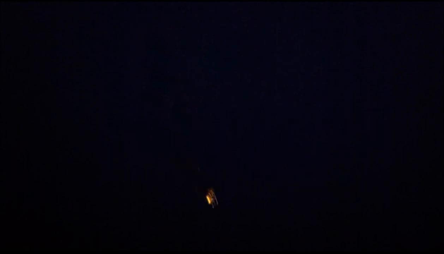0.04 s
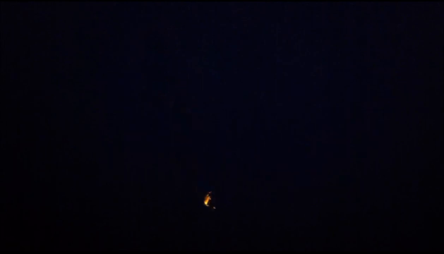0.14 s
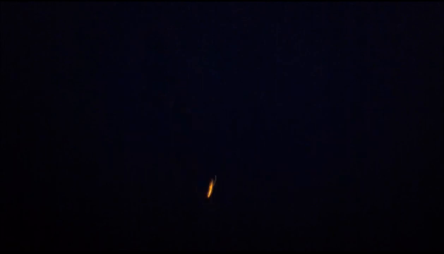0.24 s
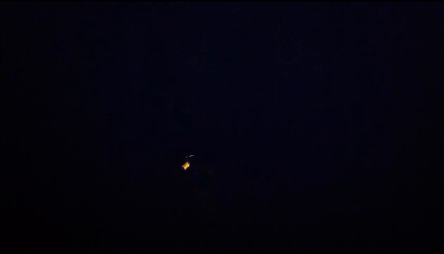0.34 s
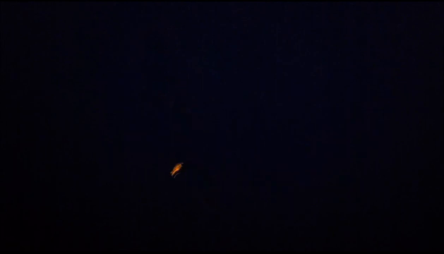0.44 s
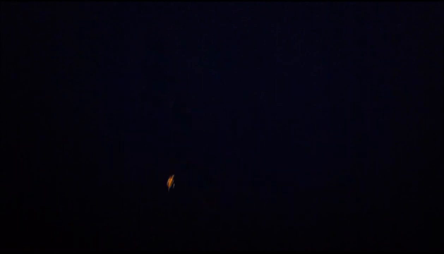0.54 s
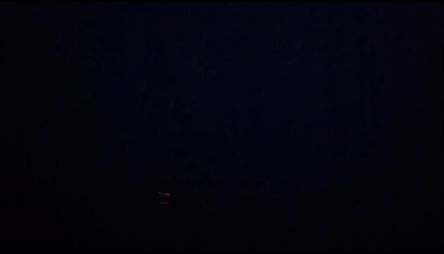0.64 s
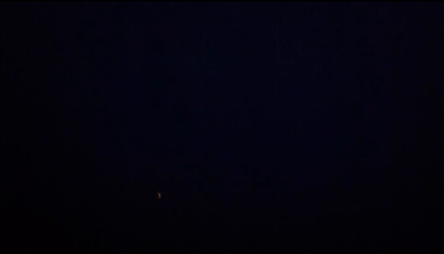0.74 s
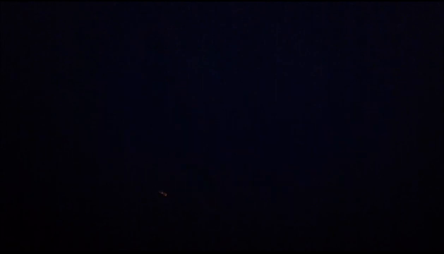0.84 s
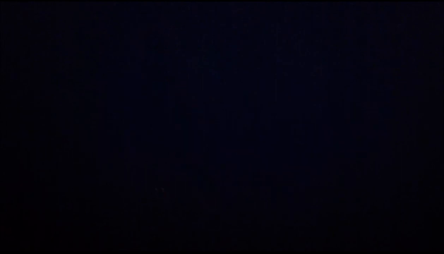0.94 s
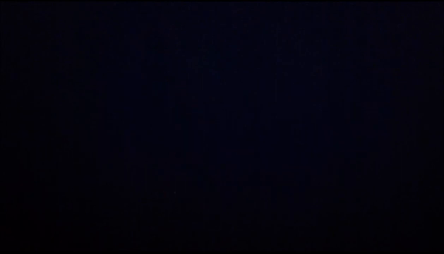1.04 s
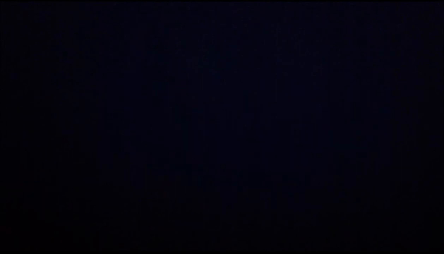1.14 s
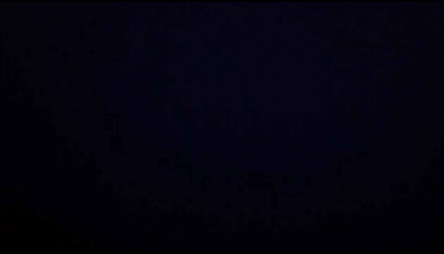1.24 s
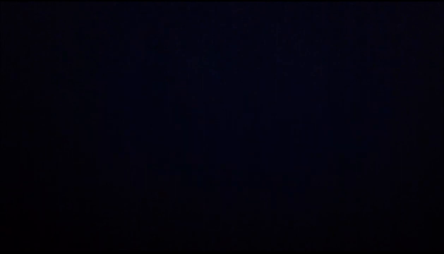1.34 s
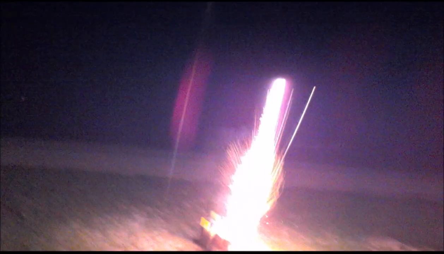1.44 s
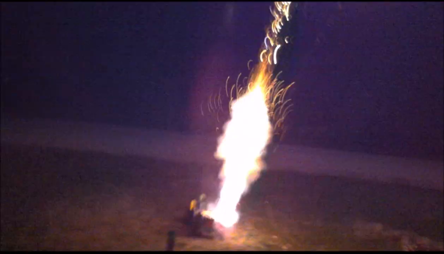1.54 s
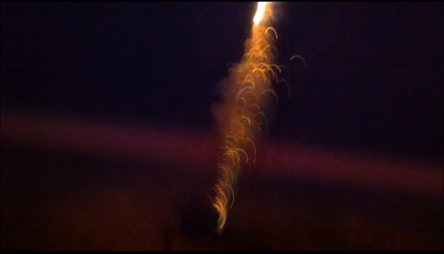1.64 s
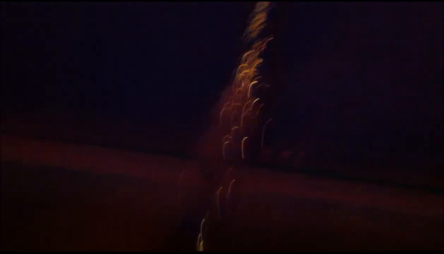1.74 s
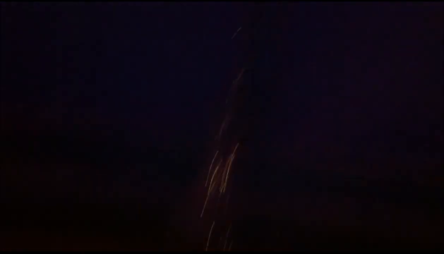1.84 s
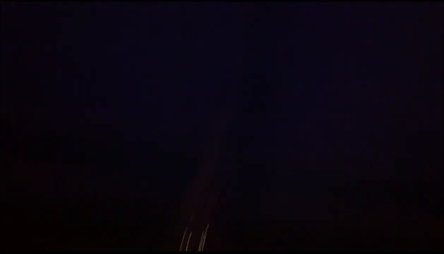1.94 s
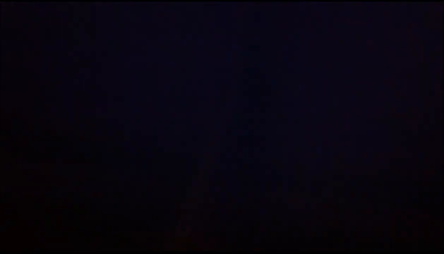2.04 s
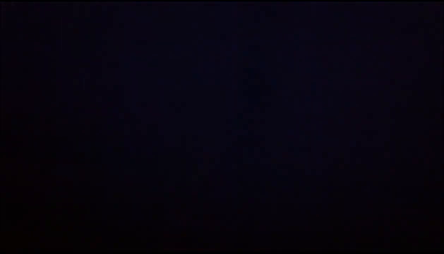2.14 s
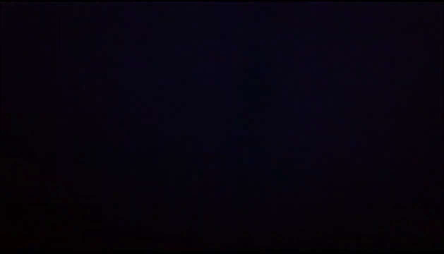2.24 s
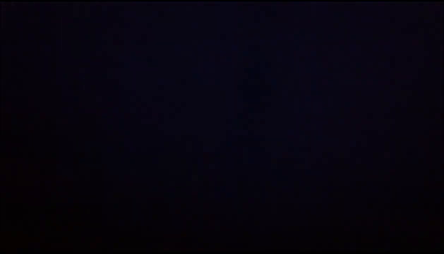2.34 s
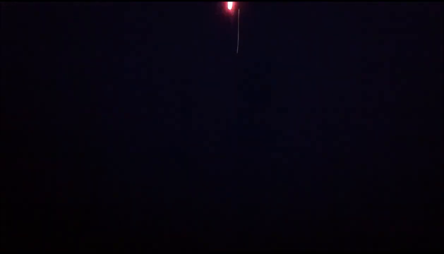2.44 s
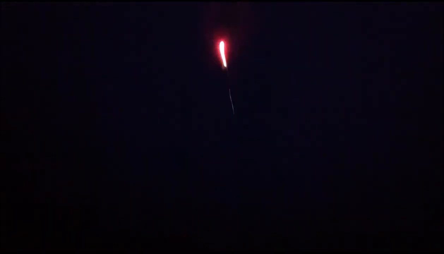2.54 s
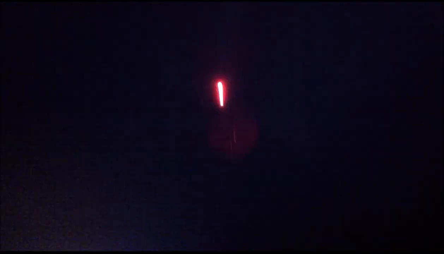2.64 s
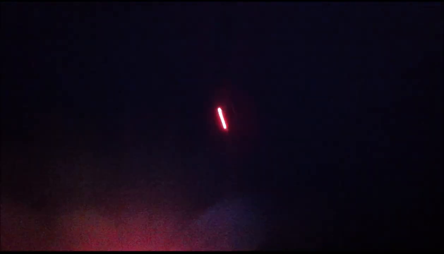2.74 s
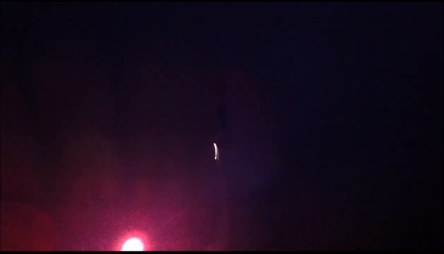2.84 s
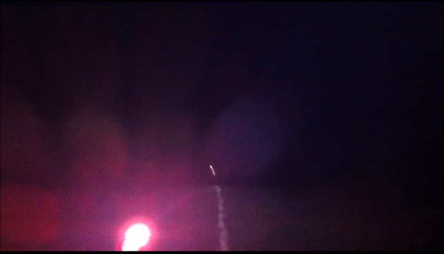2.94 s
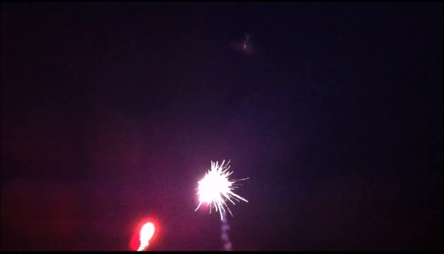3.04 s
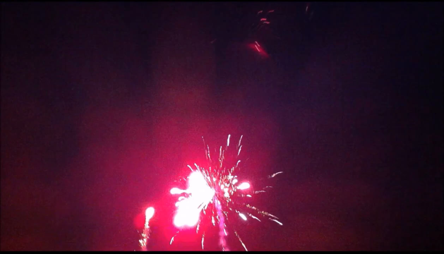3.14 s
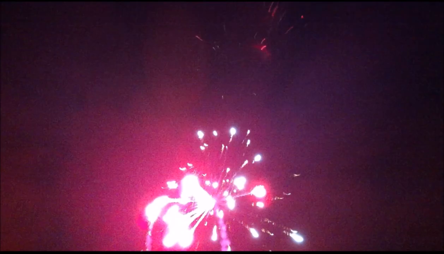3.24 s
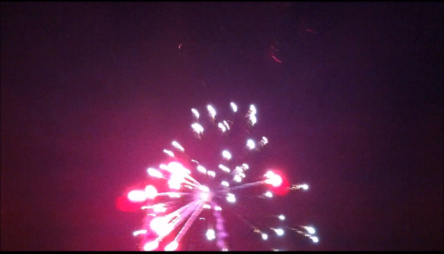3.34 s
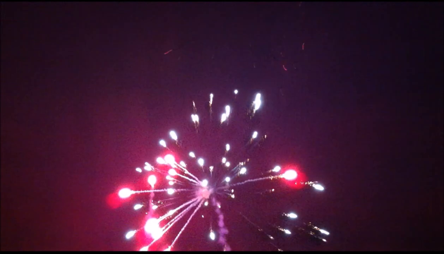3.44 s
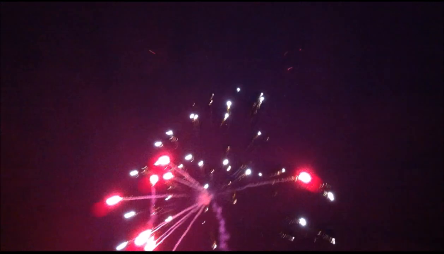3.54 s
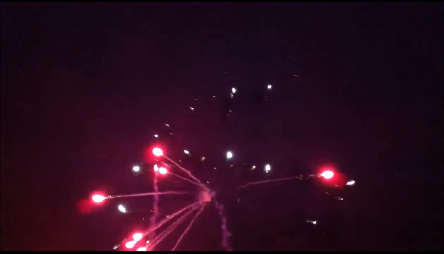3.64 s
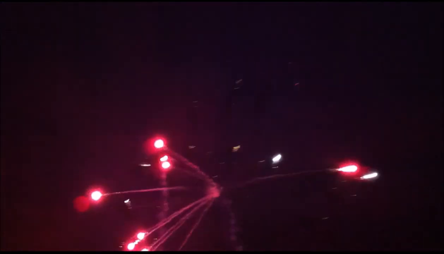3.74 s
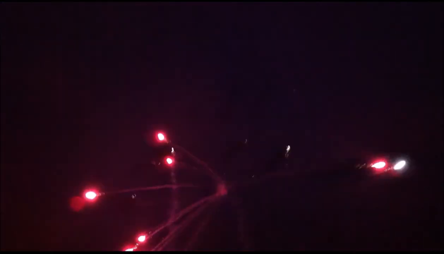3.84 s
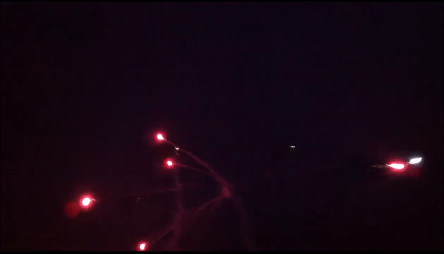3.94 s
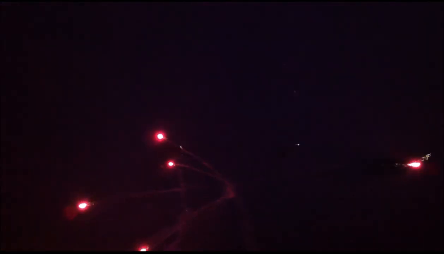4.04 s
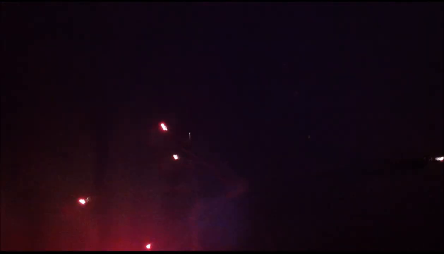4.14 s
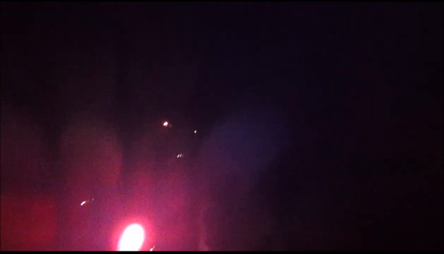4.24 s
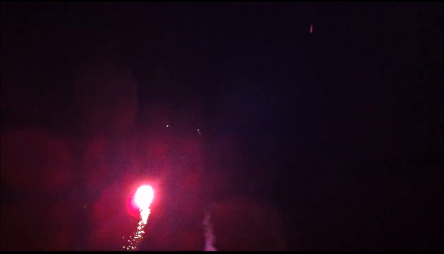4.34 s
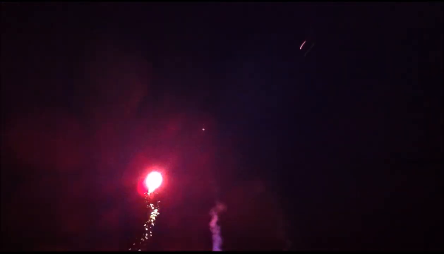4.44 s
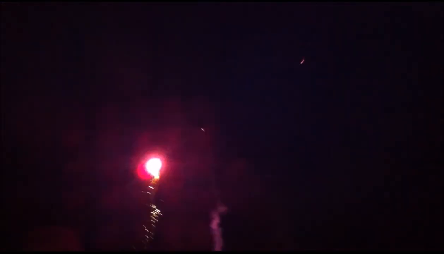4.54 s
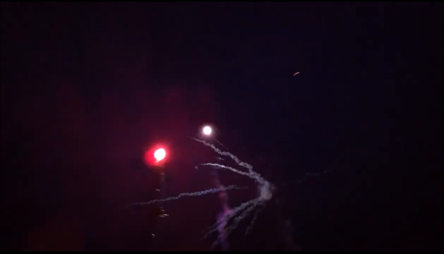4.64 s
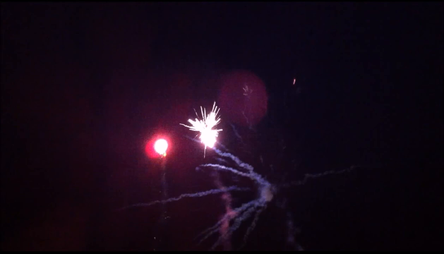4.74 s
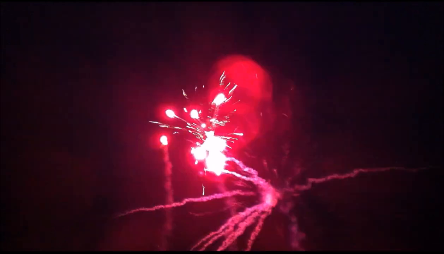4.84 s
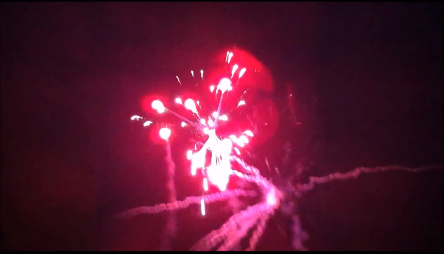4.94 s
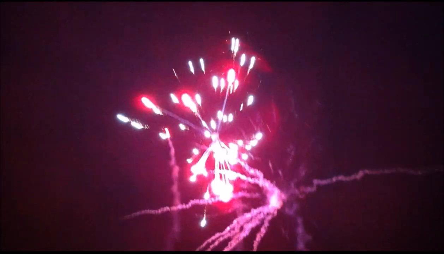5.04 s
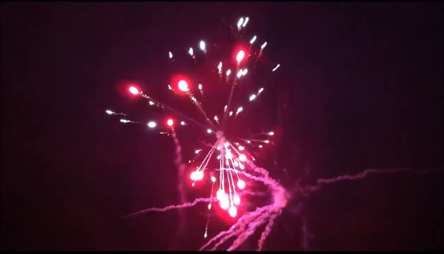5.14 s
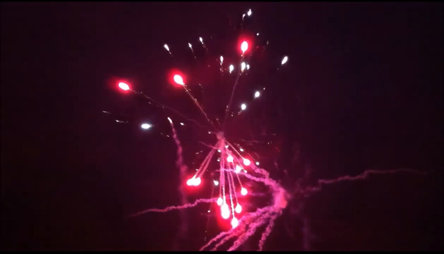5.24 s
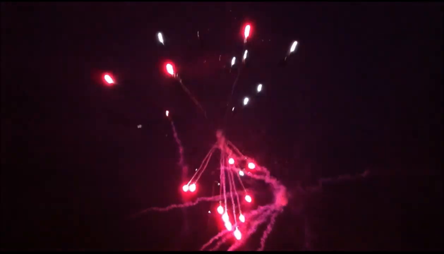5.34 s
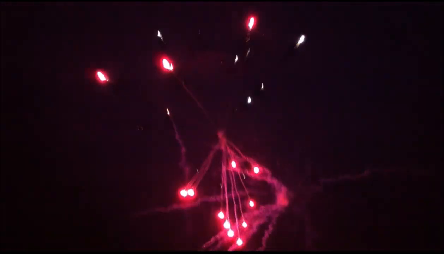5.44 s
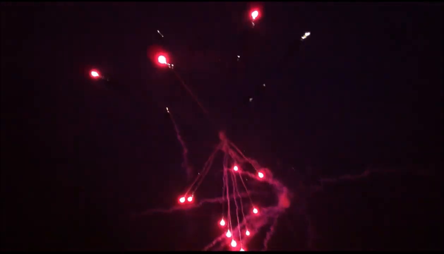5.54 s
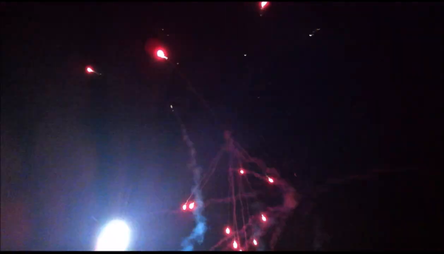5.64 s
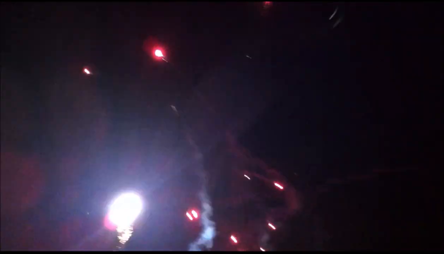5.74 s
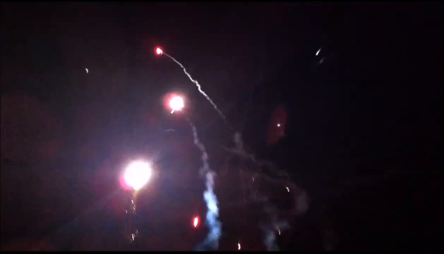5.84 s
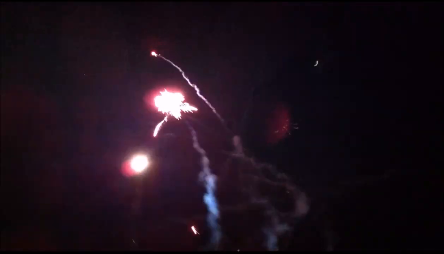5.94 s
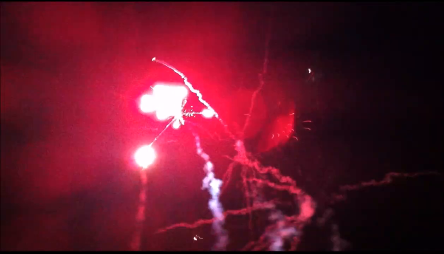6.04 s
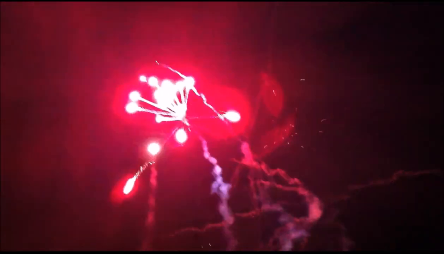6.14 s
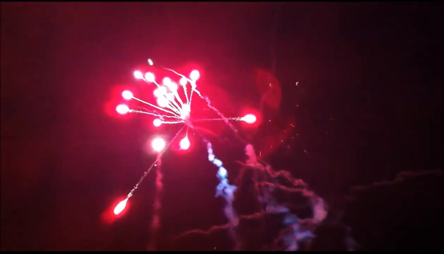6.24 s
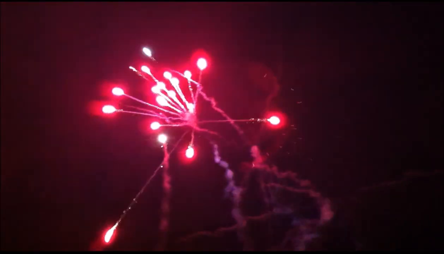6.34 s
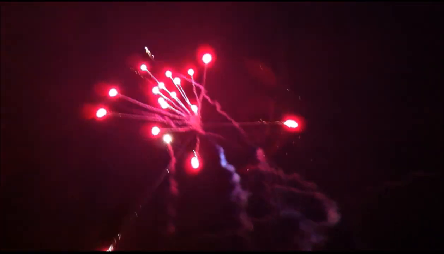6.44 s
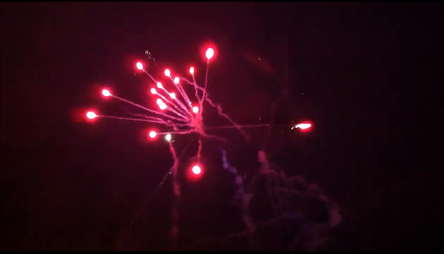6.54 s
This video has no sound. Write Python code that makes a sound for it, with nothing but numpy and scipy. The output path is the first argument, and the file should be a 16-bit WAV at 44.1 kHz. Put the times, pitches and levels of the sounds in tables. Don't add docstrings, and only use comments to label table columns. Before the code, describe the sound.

Quiet night insects and faint handling rustles, then a nearby firework cake fires four harsh, overloaded launch bangs with sharp overhead bursts and rolling echoes.

```python
import sys
import numpy as np
from scipy import signal
from scipy.fft import rfft, irfft
from scipy.io import wavfile
from scipy.ndimage import uniform_filter1d

SR = 44100
rng = np.random.default_rng(int(sys.argv[2]) if len(sys.argv) > 2 else 0)


def wrap_up_sound(samples):
    columns = np.atleast_2d(samples).T
    tamed = np.clip(columns, -1, 1)
    steps = np.round(tamed * 32767).astype(np.int16)
    wavfile.write(sys.argv[1], SR, steps)


def boost_factor(decibels):
    exponent = np.asarray(decibels, float) / 20
    return 10 ** exponent


N = 290619


def evened(x):
    return x / np.sqrt(np.mean(x ** 2) + 1e-20)


def read(points, hz):
    f, value = np.transpose(points)
    return np.interp(np.log(hz + 1), np.log(f + 1), value)


def add(mix, s, sound):
    part = mix[round(s * SR):][:len(sound)]
    part += sound[:len(part)]


def coloured(points, size):
    z = rfft(rng.standard_normal(size))
    hz = np.fft.rfftfreq(size, 1 / SR)
    return evened(irfft(z * boost_factor(read(points, hz)), size))


def resonate(x, hz, width):
    r = np.exp(-np.pi * width / SR)
    return signal.lfilter([1, 0, -r], [1, -2 * r * np.cos(2 * np.pi * hz / SR), r * r], x)


# (f/Hz, width/Hz, level/dB)
INSECTS = [
    (2284, 85, -59.5),
    (2130, 390, -63.5),
    (3330, 50, -70.5),
    (6700, 1600, -67),
]


def insects():
    throb = boost_factor(0.92 * evened(uniform_filter1d(rng.standard_normal(N), 500)))
    song = np.zeros(N)
    for hz, width, db in INSECTS:
        voice = resonate(rng.standard_normal(N), hz, width)
        song += boost_factor(db) * evened(resonate(voice, hz, width))
    return song * throb


# (t/s, depth level/dB)
DUCKS = [
    (1.579, 17.5),
    (2.66, 28),
    (3.253, 23),
    (4.02, 17.5),
    (4.995, 42),
    (5.494, 21),
    (6.159, 28.5),
]


def duck_depth(t):
    recovery_db_per_s = 12
    drops = [np.where(t > s, db - recovery_db_per_s * (t - s), 0) for s, db in DUCKS]
    return np.max(drops, 0).clip(0)


# (t/s, level/dB)
NIGHT_SWELL = [(0, 10.5), (.2, 11.5), (.5, 8.5), (.9, 7), (1.2, 5.5), (1.55, 8), (2.6, 6.5), (3.2, 12),
               (4.3, 3.5), (4.95, 4.5), (5.4, 9), (6.1, 9)]
# (f/Hz, level/dB per Hz)
AIR = [(15, -54.5), (25, -13), (65, -7.5), (156, 6.5), (358, -4.5), (423, -4), (1350, -2.5), (2280, -2.5),
       (3600, -9.5), (4680, -53), (7920, -120)]
# (f/Hz, level/dB per Hz)
HISS = [(1650, -48), (2800, -15.5), (3380, -13), (4180, -14), (4590, -12.5), (5380, -8), (7360, -8.5),
        (10700, -17), (12600, -12), (14800, -8), (15900, -5.5)]


def night():
    t = np.arange(N) / SR
    swell = boost_factor(np.interp(t, *np.transpose(NIGHT_SWELL)))
    hum = boost_factor(-63) * coloured(AIR, size=N)
    hiss = boost_factor(-61.5) * coloured(HISS, size=N)
    duck_db = duck_depth(t)
    background = hum / boost_factor(0.51 * duck_db) + hiss / boost_factor(0.83 * duck_db)
    return swell * background + insects() / boost_factor(duck_db)


# (f/Hz, level/dB per Hz)
WIND = [(15, -6), (40, -6), (90, -4), (130, 0), (220, -30), (20000, -90)]


def wind():
    gusts_db = -84 + 3.0 * evened(uniform_filter1d(rng.standard_normal(N), 6000))
    return boost_factor(gusts_db) * coloured(WIND, size=N)


# (t/s, level/dB, colour f/Hz,
# length/s)
RUSTLES = [(.17, -51.5, 790, 0.13), (.18, -55.5, 300, .1), (.295, -48.5, 600, .012),
           (.315, -46.5, 660, 0.0091), (.42, -54.5, 900, 0.057), (.55, -52, 107, 0.055),
           (.765, -51, 490, 0.066), (.78, -47, 210, 0.045), (.818, -46.5, 596, 0.011),
           (.955, -49.5, 616, 0.0091), (1.36, -58, 676, 0.052), (1.8, -55, 60, 0.18), (2.3, -59, 70, .13),
           (2.42, -51, 70, 0.11), (2.465, -46.5, 137, 0.033), (2.58, -50.5, 547, 0.034),
           (.04, -54.5, 5400, 0.15), (2.5, -57.5, 149, 0.048)]


def rustle(db, hz, length):
    scrape = resonate(rng.standard_normal(6000), hz, 0.9 * hz)
    scrape = resonate(scrape, hz, 0.9 * hz)[:round(length * SR)]
    return boost_factor(db) * evened(scrape) * signal.windows.tukey(len(scrape), 0.6)


# (t of the bang/s, level/dB, length/s)
LEADS = [
    (1.577, -31, 0.0088),
    (2.659, -15, 0.0056),
    (3.26, -45.5, 0.0065),
    (4.0225, -23, 0.0045),
    (5.004, -25, 0.0046),
    (5.492, -14, 0.0031),
    (6.142, -35, 0.0023),
]


def lead(s, db, length):
    rise = np.linspace(0, 1, round(length * SR)) ** 2
    return s - length, boost_factor(db) * rise * coloured(JET_COLOUR, size=4000)[:len(rise)]


# (t/s, level/dB, f/Hz,
# t60/s)
RINGS = [(1.5792, -1.5, 758, .042), (1.582, -1, 1995, .013), (1.5843, -7, 2260, .013),
         (1.5873, -5.5, 1770, .032), (1.5917, -16, 1460, .0044), (1.600, -11, 2210, .0091),
         (1.609, -15.5, 2490, .019), (2.6655, -10.5, 1830, .0063), (4.0233, -5, 1520, .0085),
         (4.0308, -14.5, 1754, .012), (4.0345, -22, 1850, .0099), (4.0735, -10, 2760, .012),
         (5.497, -1.5, 2500, .0052), (5.4983, -15.5, 2050, .004), (5.5017, -5.5, 2250, .0046),
         (5.5462, -16.5, 8700, .011)]


def ring(db, hz, t60):
    t = np.arange(2000) / SR
    wander = evened(uniform_filter1d(rng.standard_normal(2000), round(SR / hz)))
    turns = np.cumsum(hz * (1 + 0.15 * wander - 0.081 * t / t60)) / SR
    swing = np.sin(2 * np.pi * turns) + 0.31 * np.sin(2 * np.pi * 1.55 * turns)
    return -boost_factor(db - 40 * t / t60 - 39 * (t / t60) ** 2) * swing


# (t/s, level/dB, colour f/Hz, t60/s, share of wide noise 0-1)
JETS = [(1.5815, -17.5, 1460, .058, 0.52), (1.5858, 1, 4480, 0.025, 0.77), (1.590, -10, 1520, 0.092, 0.62),
        (1.596, -15.5, 11500, .0099, 0.36), (2.6585, -5.5, 1200, 0.014, 0.63),
        (2.661, -1, 5560, .022, 0.72), (2.6645, -10, 2130, 0.11, 0.48), (3.258, -11, 2750, 0.053, 0.94),
        (3.296, -15.5, 1800, 0.017, 0.35), (3.3, -28, 4800, 0.0089, .2), (4.0155, -19, 1200, 0.062, 1),
        (4.0205, -4.5, 7100, 0.0057, 0.15), (4.0225, -6.5, 3200, 0.094, 0.68),
        (5.4927, -21, 4000, .011, 0.11), (5.494, -16, 8700, 0.02, 0.22), (5.4965, -11, 2850, 0.11, 0.7)]
# (f/Hz, level/dB per Hz)
JET_COLOUR = [(35, -26), (60, -28.5), (358, 8.5), (1330, -6.5), (2970, -6.5), (7780, -33), (10100, -31),
              (15000, -17.5), (16500, -44.5)]


def jet(db, hz, t60, wide_share):
    t = np.arange(5000) / SR
    wide = coloured(JET_COLOUR, size=5000)
    tone = evened(resonate(rng.standard_normal(5000), hz, 0.71 * hz))
    share = np.clip(wide_share, 0, 1)
    rise = np.minimum(t / (0.033 * t60), 1)
    return boost_factor(db - 60 * t / t60) * rise * (share * wide + (1 - share) * tone)


# (t/s, level/dB, f/Hz, t60/s)
THUMPS = [
    (1.5905, -1, 204, 0.015),
    (1.6015, -10.5, 328, 0.03),
    (1.6480, -20, 302, 0.034),
    (2.6662, -8.5, 297, 0.011),
    (3.2746, -19, 298, 0.066),
    (3.3001, -18, 314, 0.054),
    (4.0242, 7.7, 306, 0.0092),
    (5.0420, -32, 310, .04),
    (5.4968, -9, 228, 0.041),
    (6.2051, -25, 310, 0.046),
]


def thump(db, hz, t60):
    t = np.arange(3000) / SR
    return -boost_factor(db - 60 * t / t60) * np.sin(2 * np.pi * hz * t)


# (t/s, tail level/dB, tail tilt/dB per octave, near wall level/dB, far wall level/dB)
LAUNCHES = [
    (1.5874, -1.5, 0.2, -8, -26.5),
    (2.6631, -1, 0.6, 2, -2),
    (4.0206, -0.74, 0.34, 0, 2.8),
    (5.4940, 1.06, 0.53, -1, 1.3),
]
# (level/dB, f/Hz, t60/s)
NEAR_WALL = [
    (-16.5, 310, 0.025),
    (-22.5, 240, 0.032),
    (-12, 3900, 0.011),
    (-15.5, 6700, 0.017),
]
# (level/dB, f/Hz, t60/s)
FAR_WALL = [
    (-17, 290, 0.035),
    (-18.5, 2900, 0.036),
    (-28.5, 3600, 0.25),
    (-19.5, 4000, 0.0064),
    (-17, 3500, 0.013),
    (-14, 3630, .0055),
]
NEAR_WALL_S = (.0223, .040, .0217, .021)
FAR_WALL_S = (.056, .052, .061, .0494, .0533, .0575)


def walls(s, near_db, far_db):
    def hiss(db, hz, t60):
        return jet(db, hz, t60, wide_share=0.3)

    near = zip((thump, thump, ring, hiss), NEAR_WALL_S, NEAR_WALL)
    far = zip((thump, hiss, hiss, ring, ring, ring), FAR_WALL_S, FAR_WALL)
    slaps = []
    for wall_db, wall in ((near_db, near), (far_db, far)):
        for source, delay, (db, *row) in wall:
            slaps.append((s + delay, source(wall_db + db, *row)))
    return slaps


# (delay t/s, build-up/s, level/dB, tilt/dB per octave, t60/s)
LAUNCH_ECHOES = [
    (.025, 0.012, -37, -8.5, 0.95),
    (0.031, .02, -34.5, 3, 0.57),
    (0.093, 0.03, -27.5, 3, 0.51),
    (.15, .1, -37.5, 1.2, 2.44),
    (.4, 0.22, -55, -2.5, 5.4),
]
BURST_ECHOES = [
    (.014, 0.0095, -23, -5, 0.18),
    (.015, 0.035, -26.5, 0, 1.46),
    (0.081, 0.26, -29, -0.8, 3.32),
    (.5, 0.64, -43, -2, 8.9),
]


def echo_power(hz, t):
    octaves = np.log2((hz + 150) / 1100)
    loss_db_per_s = 28 * (hz / 10000) ** 0.87
    power = 1e-14
    for bangs, groups in ((LAUNCHES, LAUNCH_ECHOES), (BURSTS, BURST_ECHOES)):
        for s, db, tilt_db, *_ in bangs:
            air_db = loss_db_per_s * np.maximum(t - s, 0)
            for delay, build, group_db, group_tilt_db, t60 in groups:
                age = np.maximum(t - s - delay, 0)
                level_db = db + group_db + (tilt_db + group_tilt_db) * octaves - 60 * age / t60 - air_db
                power = power + (np.minimum(age / build, 1) * boost_factor(level_db)) ** 2
    return power


# (f/Hz, level/dB per Hz)
TAIL_COLOUR = [(29, -46), (50, -36), (119, -6.5), (240, -1.5), (559, 1.5), (997, -3), (2010, -2),
               (2680, -5.5), (3100, -5), (6240, -14.5), (10100, -23), (13200, -24), (16000, -29.5)]


def tails():
    hz, frame_s, spectrum = signal.stft(coloured(TAIL_COLOUR, size=N), SR, nperseg=512, noverlap=384)
    hz = hz[:, None]
    field_db = 10 * np.log10(echo_power(hz, frame_s))

    def blotches(bands, frames):
        grain = uniform_filter1d(rng.standard_normal(field_db.shape), bands, 0)
        return evened(uniform_filter1d(grain, frames, 1))

    patches = blotches(8, 10)
    ridges = blotches(2, 50)
    housing_db = 1.4 * np.exp(-((hz - 2200) / 300) ** 2)
    level_db = field_db + housing_db + 1.1 * patches + 2.0 * ridges
    return signal.istft(spectrum * boost_factor(level_db), SR, nperseg=512, noverlap=384)[1][:N]


# (t/s, spike level/dB, spike width/ms, suction level/dB, share of a close twin spike)
SHOCKS = [(3.2533, -5, 0.074, 5.5, 0.6), (3.2559, -33, .14, -17, 0), (4.9959, 2.5, 0.13, 1.5, 0.86),
          (6.1596, 2.5, 0.13, 3.7, .99), (6.1645, -34, .13, -17.5, .2), (2.6628, -20, 0.17, 0.5, .21),
          (2.6638, 3.5, 0.67, -23, 0.53), (4.0206, 8.5, 0.14, -5.2, 0.21), (5.4941, -4, 0.073, 0.5, 0.047),
          (5.4945, 12.5, .071, -9, 0), (5.4951, -8, 0.12, -31.5, 0), (5.4955, -1, 0.06, -13, 0)]


def shock(spike_db, width_ms, suction_db, twin, low_hz=180):
    u = np.arange(1500) / SR * 1000 / width_ms

    def spike(v):
        return np.sin(np.pi * np.clip(v, 0, 1)).clip(0) ** 1.85

    fall = np.sin(np.pi / 2 * np.clip(u - 0.87, 0, 1)) ** 2
    swing = signal.sosfilt(signal.butter(2, low_hz, "high", fs=SR, output="sos"), fall)
    push = spike(u / 1.076) + twin * spike(u / 1.095 - 1.05)
    return boost_factor(spike_db) * push - 1.125 * boost_factor(suction_db) * swing


# (t/s, tail level/dB, tail tilt/dB per octave, ground echo level/dB)
BURSTS = [
    (3.2534, 0.6, 0.5, 5),
    (4.9959, -9.5, 0.6, -0.5),
    (6.1595, -5, 0.7, 3.5),
]


def burst(s, tail_db, echo_db):
    def fizz():
        return jet(-13.5 + 0.62 * tail_db, hz=2240, t60=0.038, wide_share=0.71)

    ground_s = s + 0.0114
    echo = shock(echo_db, width_ms=0.36, suction_db=echo_db - 4.5, twin=0.58)
    return [(s, fizz()), (ground_s, echo), (ground_s, fizz())]


# (t/s, level/dB, colour f/Hz, length/s)
LATE_SLAPS = [
    (3.774, -40.5, 820, 0.052),
    (4.798, -47, 546, 0.023),
    (4.897, -48.5, 480, 0.059),
    (6.095, -46, 587, 0.032),
]


def late_slap(db, hz, length):
    return rustle(db, hz, length)


def scene():
    mix = night() + tails()
    for table, source in ((RUSTLES, rustle), (RINGS, ring), (JETS, jet), (THUMPS, thump),
                          (SHOCKS, shock), (LATE_SLAPS, late_slap)):
        for s, *row in table:
            add(mix, s, source(*row))
    parts = [lead(*row) for row in LEADS]
    for s, _, _, near_db, far_db in LAUNCHES:
        parts += walls(s, near_db, far_db)
    for s, tail_db, _, echo_db in BURSTS:
        parts += burst(s, tail_db, echo_db)
    for s, sound in parts:
        add(mix, s, sound)
    return mix[None]


# (t/s, length/s, lowest f/Hz, share of bands dropped 0-1)
STARVED = [(.4, .022, 300, .5), (.7, .022, 300, .6), (1.03, .03, 2500, .85), (1.03, .03, 250, .5),
           (1.13, .022, 500, .6), (1.45, .02, 2500, .5), (1.56, .025, 3000, .8), (1.618, .008, 4500, .7),
           (1.68, .012, 4500, .9), (1.905, .03, 4500, .95), (2.646, .01, 100, 1), (2.68, .018, 4300, 1),
           (2.727, .014, 6500, .9), (2.79, .012, 6500, .9), (3.0, .016, 6000, .6), (3.39, .015, 3000, .5),
           (3.277, .014, 7200, .9), (4.056, .012, 7000, .8), (4.56, .015, 4000, .5), (4.75, .02, 3500, .7),
           (4.975, .03, 3200, .85), (5.002, .006, 5000, .7), (5.051, .014, 6500, .9), (5.482, .01, 1300, 1),
           (5.605, .012, 4000, .5), (5.91, .03, 3500, .75), (5.91, .03, 8800, 1), (6.15, .01, 100, 1)]


def starve(x, faint_db=-104, steady=0.5, top_hz=15850):
    hz, t, z = signal.stft(x, SR, nperseg=512, noverlap=448)
    band = (np.sqrt(hz) / 1.9).astype(int)
    luck = rng.random((len(STARVED), band.max() + 1))
    keep = np.ones(z.shape)
    for (s, length, above_hz, share), draw in zip(STARVED, luck):
        dropped = (hz > above_hz) & (draw[band] < share)
        keep[np.ix_(dropped, abs(t - s) < length / 2 + 0.001)] = 0.12
    x = signal.istft(z * keep, SR, nperseg=512, noverlap=448)[1]

    hz, t, z = signal.stft(x, SR, nperseg=2048)
    level_db = 10 * np.log10(uniform_filter1d(abs(z) ** 2, size=5, axis=0) + 1e-20)
    open_share = np.clip((level_db - faint_db) * steady, 0.05, 1)
    open_share[hz < 3000] = 1
    loud = abs(z).max(0) > boost_factor(-37)
    open_share[(hz > top_hz)[:, None] & ~loud] = 0
    return signal.istft(z * open_share, SR, nperseg=2048)[1][:N]


def band_limit(x):
    return signal.sosfilt(signal.butter(12, 16830, fs=SR, output="sos"), x)


def record(dry):
    x = dry / (1 + abs(dry) ** 6) ** (1 / 6)
    low_cut = signal.butter(4, 115, "high", fs=SR, output="sos")
    x = 0.12 * x + 0.88 * signal.sosfilt(low_cut, x)
    x = x[0] + wind()
    finished = np.clip(starve(x)[None], -1, 1)
    return band_limit(finished)


dry = scene()
out = record(dry)
wrap_up_sound(out)
```